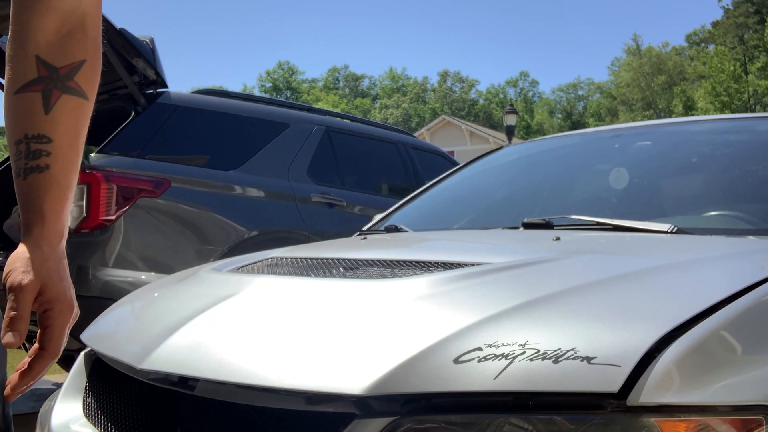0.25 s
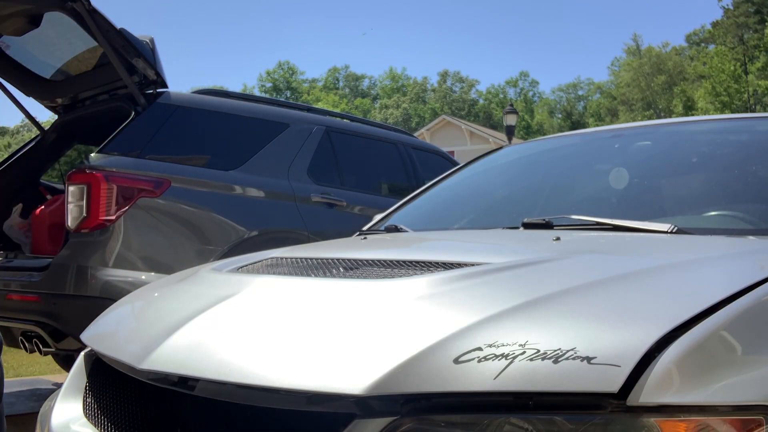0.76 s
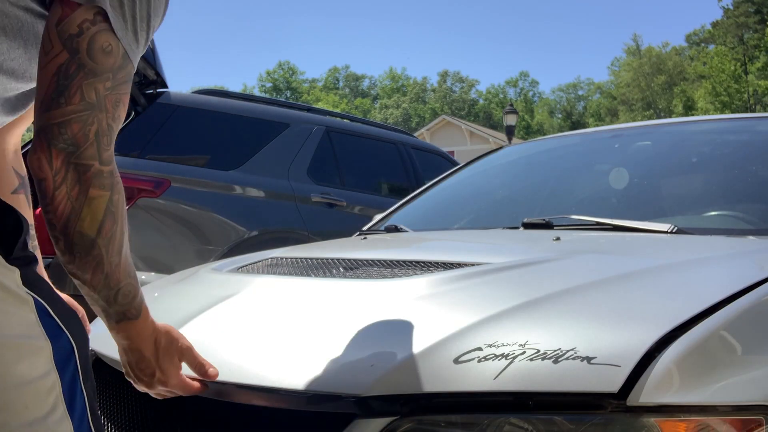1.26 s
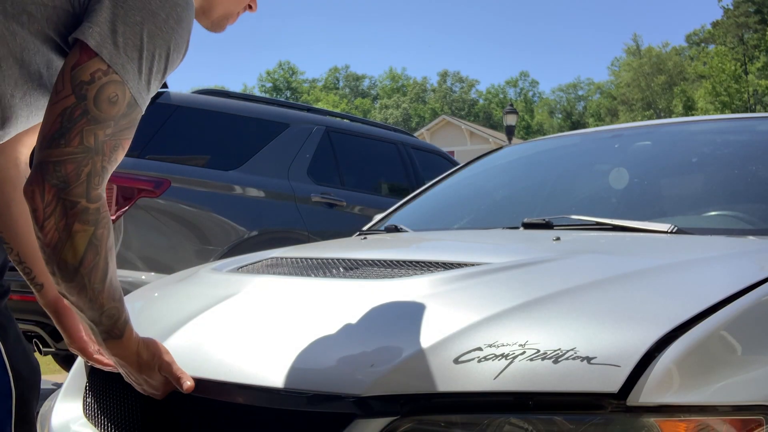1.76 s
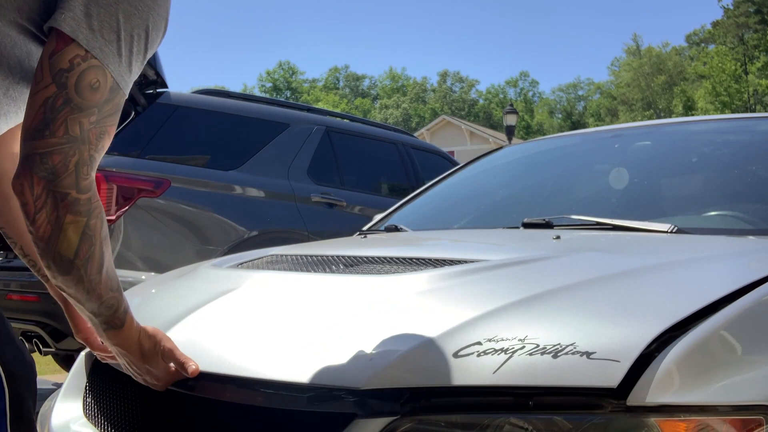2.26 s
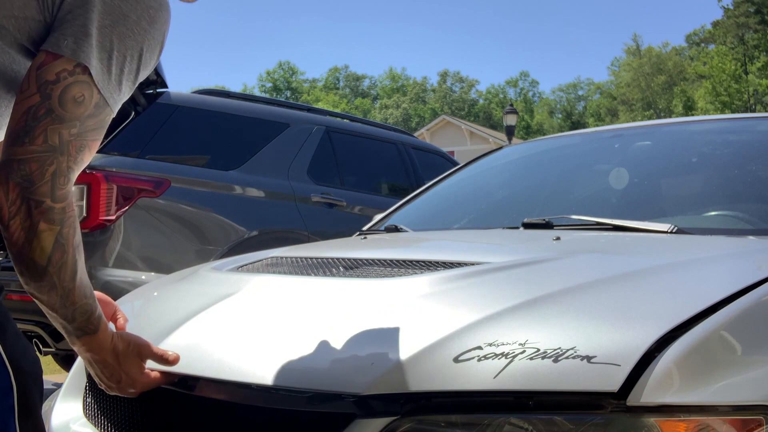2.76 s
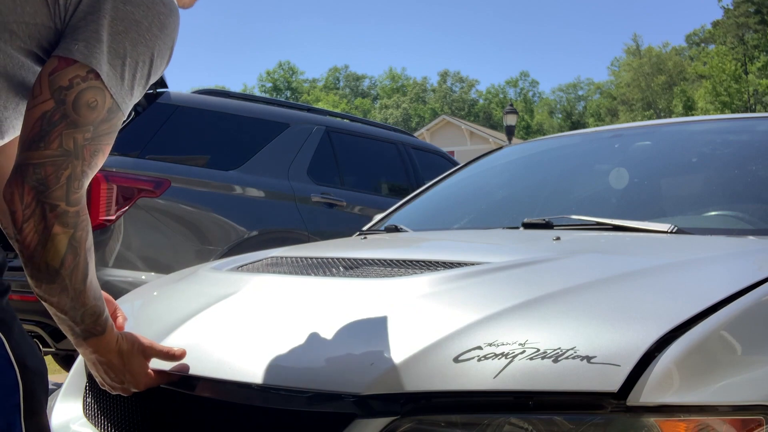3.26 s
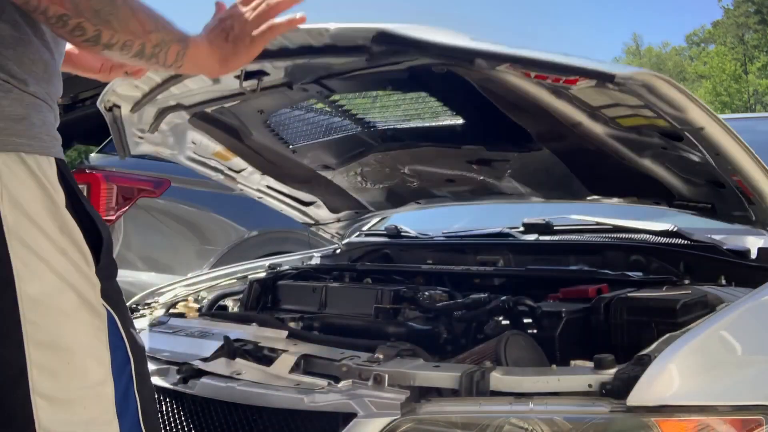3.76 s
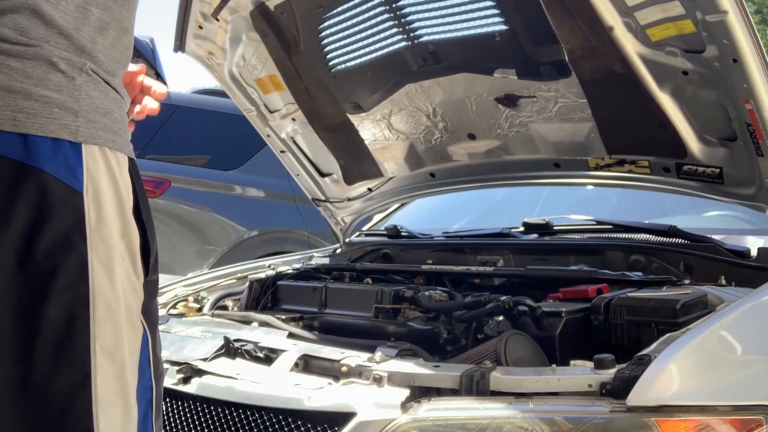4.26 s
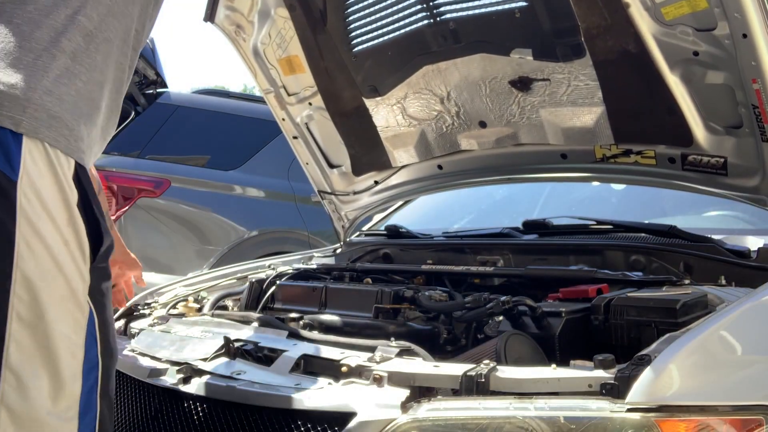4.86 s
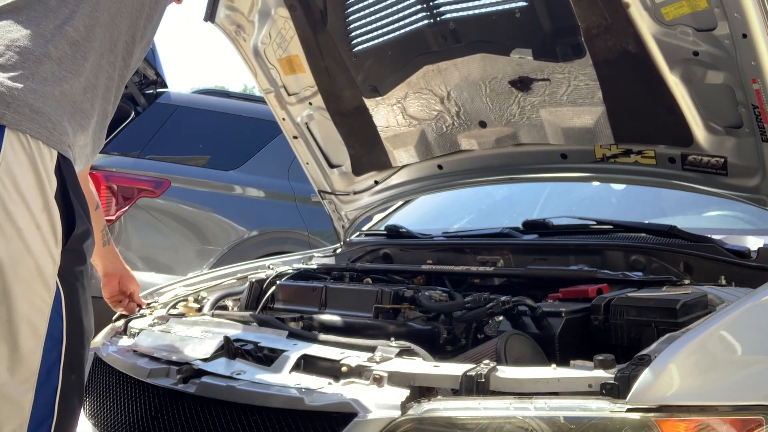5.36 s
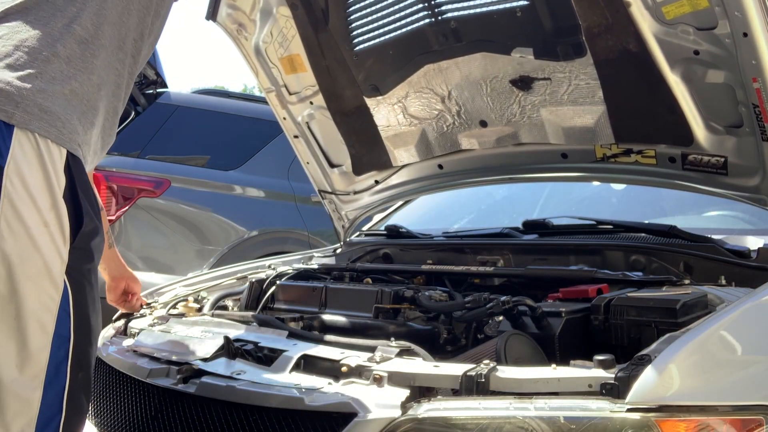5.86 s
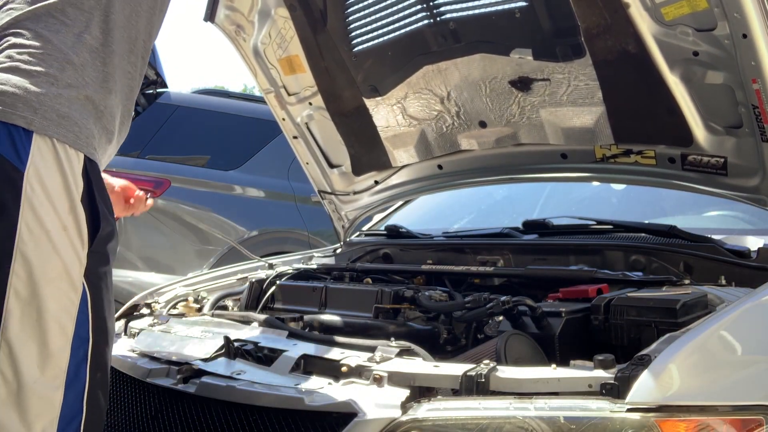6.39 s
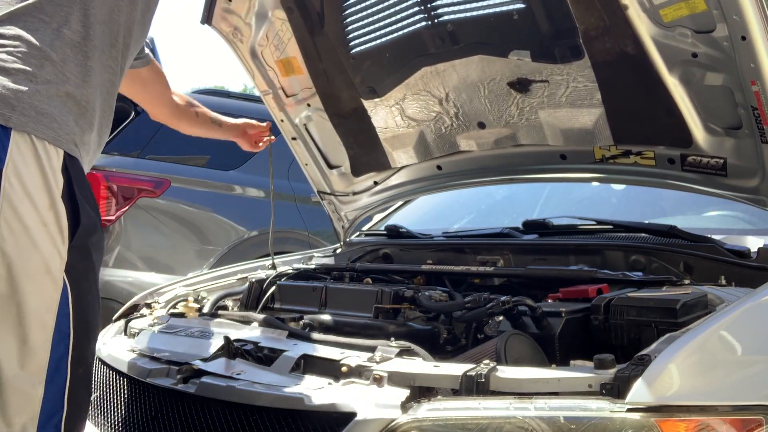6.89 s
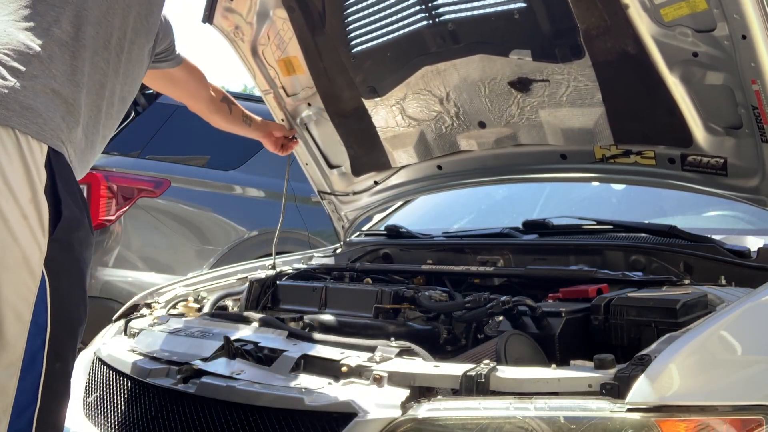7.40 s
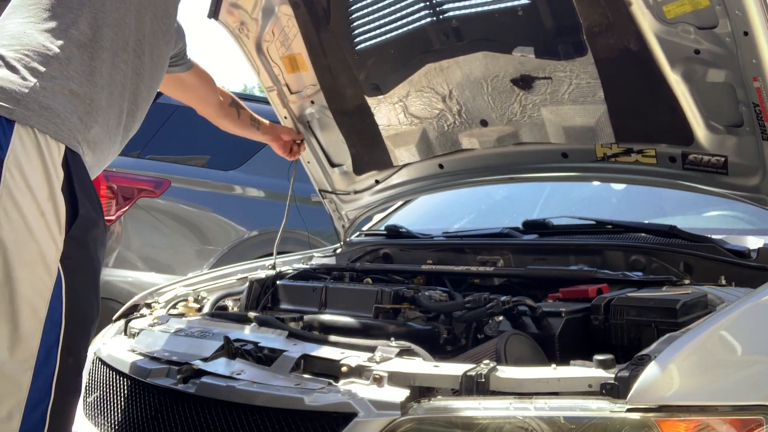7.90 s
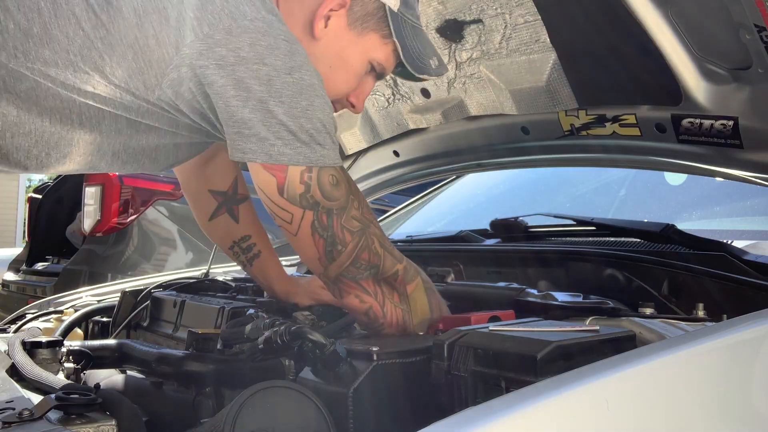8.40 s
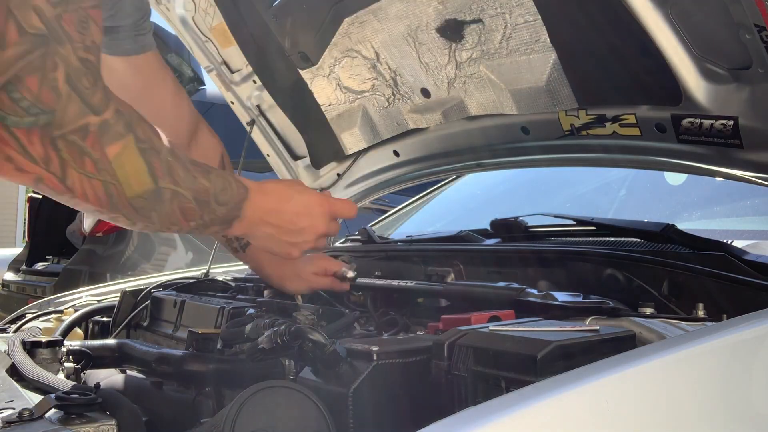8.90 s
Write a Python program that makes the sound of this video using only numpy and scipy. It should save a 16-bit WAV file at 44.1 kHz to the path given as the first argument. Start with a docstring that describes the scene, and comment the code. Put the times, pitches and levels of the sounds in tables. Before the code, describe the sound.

Close stereo pickup outdoors beside a car, over a faint low rumble. Fabric brushes, small latch snaps, then two heavy sheet-metal thuds, the second strongest and deepest. A brief high squeak and bright snap free the hood; hinges rasp and rattle. After a pause come a hollow knock, a sharp rod click, metallic sliding hiss, and firm hollow knocks as the rod seats. Faint taps and sleeve brushing finish it.

```python
"""Soft air and a low rumble, both coloured noise, lie under a car hood being opened in a quiet driveway.
Clothes rustle and a sleeve brushes brightly, as uneven noise; a pressing hand makes the sheet metal boom and
clunk with fading tones and noise. A sole squeaks as a gliding tone, the safety catch squeaks and snaps free, and
the hinges scrape and click. The steel prop rod is pulled from its clip, hisses as it swings up and knocks on the
raised hood. Last, the rod taps dryly, small parts click, a sleeve brushes lightly and the background briefly dips."""
import sys
import numpy as np
from scipy import signal
from scipy.fft import rfft, irfft, next_fast_len
from scipy.io import wavfile

SR = 44100
rng = np.random.default_rng(int(sys.argv[2]) if len(sys.argv) > 2 else 0)


def pcm_store(signal):
    """Save signal as 16-bit PCM."""
    levels = np.round(np.clip(np.atleast_2d(signal), -1, 1) * 32767)
    wavfile.write(sys.argv[1], SR, levels.astype(np.int16).T)


N = 403074
TIME = np.arange(N) / SR
RING = np.arange(32768) / SR  # time within one blow, boom or squeak [s]
PADDED = next_fast_len(N + SR // 10, real=True)  # spare room so that filters do not wrap around
SIDES = np.array([[1], [-1]])  # left ear, right ear

# The two ears: (frequency [Hz], left-right likeness of the background [-1 to 1], left minus right [dB])
STEREO = [(69.9, 0.9, 2), (280, 0.61, 1.5), (716, -0.43, -1), (1600, -0.23, -2.5), (4000, 0.16, -0.5),
          (10230, -0.17, 1)]
# Colour of the hinges and rod mount, both rubbed and struck: (frequency [Hz], relative level per Hz [dB])
HINGE_COLOUR = [(210, -35), (350, 3), (391, -4), (554, -3), (1460, -5.5), (1600, -6.5), (1910, -10),
                (2930, -16), (13000, -34.5), (15500, -45)]


def from_db(db):
    """Turn decibels into a gain."""
    return 10 ** (np.asarray(db) / 20)


def rms(x):
    """Average strength of a signal (root mean square)."""
    return np.sqrt(np.mean(x ** 2) + 1e-30)


def at_hz(rows, hz):
    """Read every column of a table at the given frequencies, on a logarithmic frequency axis."""
    points, *columns = np.transpose(rows)
    return [np.interp(np.log(hz + 1e-9), np.log(points), column) for column in columns]


def add(out, s, sound):
    """Mix a sound in at time s."""
    start = round(s * SR)
    out[start:start + len(sound)] += sound[:N - start]


def dying(t60):
    """A fade that falls by 60 dB in t60 seconds."""
    return from_db(-60 * RING / max(t60, 1e-3))


def shaped(white, colour, peaks=()):
    """Give a signal a colour and resonances, with steep ends; returns (frequencies, spectrum)."""
    hz = np.fft.rfftfreq(white.shape[-1], 1 / SR)
    low_end = 1 + (colour[0][0] / (hz + 1)) ** 8
    high_end = 1 + (hz / colour[-1][0]) ** 8
    lift = 1
    for centre, width, db in peaks:
        lift = lift + from_db(db) ** 2 / (1 + (2 * (hz - centre) / width) ** 2)
    gain = from_db(at_hz(colour, hz)[0]) * np.sqrt(lift / (low_end * high_end))
    return hz, rfft(white) * gain


def diffuse(colour, peaks=()):
    """Noise from all around, most alike in both ears in the bass; the mean of the ears has rms 1."""
    hz, (mid, side) = shaped(rng.standard_normal((2, PADDED)), colour, peaks)
    alike, pan_db = at_hz(STEREO, hz)
    alike = np.clip(alike, -.99, .99)
    ears = np.sqrt(1 + alike) * mid + np.sqrt(1 - alike) * side * SIDES
    x = irfft(from_db(SIDES * pan_db / 2) * ears, PADDED)[:, :N]
    return x / rms(x.mean(axis=0))


def rubbing(strokes, colour, grain_db, peaks=(), judder_db=1.5):
    """A crowd of uneven micro-slips, a millisecond or two each, excites a surface as strongly as it is rubbed."""
    force = 0
    for s, db, swell, hold, fade in strokes:
        slack = np.maximum((s - TIME) / swell, (TIME - s - hold) / fade)
        force = force + from_db(db - 20 * np.clip(slack, 0, 10))
    # the contact catches and lets go some tens of times a second
    catches = np.arange(0, N, 600)
    judder = np.interp(np.arange(N), catches, rng.standard_normal(len(catches)))
    force = force * from_db(judder_db * judder)
    # each slip keeps one random strength for 64 samples
    slips = np.repeat(rng.standard_normal(PADDED // 64 + 1), 64)[:PADDED]
    grains = rng.standard_normal(PADDED) * from_db(grain_db * slips)
    _, spectrum = shaped(grains, colour, peaks)
    friction = irfft(spectrum, PADDED)[:N]
    return force * friction / rms(friction)


def struck(blows, modes, colour, registers_db, t60s, ring, modes_db, crack_db, crack_t60, tail_db, tail_t60,
           clack_hz=850, rattle_db=2.5):
    """Each blow rings a part: clear modes over a wash of crowded ones, a short crack first, a faint tail last."""
    # Pitch ranges, each with its own balance and fade: (low edge [Hz], high edge [Hz])
    registers = [(150, 450), (450, 1100), (1100, 2800), (2800, 7000), (7000, 16000)]
    pivot_hz, clack_octaves = 1000, 1  # centre of the brightness tilt; spread of the clack
    rattle_s, spot_q = .004, 4.1  # time between touches of loose parts; sharpness of the spot resonance
    start = round(.03 * SR)  # the first 30 ms set the loudness of each register
    out = np.zeros(N)
    extras = []
    for low, high in registers:
        # the crack is weaker in the bass; the tail from neighbouring cars and walls is shorter in the treble
        crack = (from_db(crack_db) * dying(crack_t60)) ** 2 * low / (low + 700)
        tail = (from_db(tail_db) * dying(tail_t60 / (1 + low / 7000))) ** 2
        extras.append(crack + tail)
    octaves = np.log2(np.sqrt(np.prod(registers, axis=1)) / pivot_hz)
    midrange = np.exp(-((octaves - np.log2(clack_hz / pivot_hz)) / clack_octaves) ** 2)
    for s, level_db, brightness, clack_db, spot_hz, spot_db, attack_s, *held in blows:
        blow = 0
        onset = 1 - np.exp(-RING / max(attack_s, 1e-4))
        free = held[0] if held else 1  # a hand on the part changes its ring time
        # a harder contact tilts the balance upwards; where it lands decides how much the midrange clacks
        levels_db = level_db + np.array(registers_db) + brightness * octaves + clack_db * midrange
        hz, wash = shaped(rng.standard_normal(len(RING)), colour)
        wash = wash / rms(irfft(wash))
        # every blow lands elsewhere, so each mode gets a new strength and sign
        strength = from_db(modes_db + rng.normal(0, 2.4, len(modes)))
        strength = strength * rng.choice([-1, 1], len(modes))
        for (low, high), wash_t60, extra, db in zip(registers, t60s, extras, levels_db):
            band = irfft(wash * ((hz >= low) & (hz < high)))
            part = band * np.sqrt(dying(wash_t60 * free) ** 2 + extra)
            # loose parts chatter while the blow dies away
            touches = rng.standard_normal(256)
            chatter = np.interp(RING / rattle_s, np.arange(len(touches)), touches)
            part = part * from_db(rattle_db * chatter)
            for (mode_hz, mode_db, t60), gain in zip(modes, strength):
                if low <= mode_hz < high:
                    tone = np.sin(2 * np.pi * mode_hz * RING)
                    part = part + gain * from_db(mode_db) * dying(t60 * ring * free) * tone
            part = part * onset
            blow = blow + from_db(db) * part / rms(part[:start])
        # the spot that is hit favours one resonance of the part
        spot = signal.lfilter(*signal.iirpeak(spot_hz, spot_q, fs=SR), blow)
        add(out, s, blow + (from_db(spot_db) - 1) * spot)
    return out


def outdoors():
    """Soft air and far traffic over a low rumble with a motor's drone; the level dips briefly near the end."""
    # Background levels: (time [s], air level [dB], rumble level [dB])
    background = [(0, -56, -51.5), (2.2, -54, -51), (4.3, -57, -54), (5.5, -57.5, -49), (8.1, -55, -50),
                  (8.25, -58.5, -57)]
    # Colour of the air: (frequency [Hz], relative level per Hz [dB])
    air_colour = [(110, 3.5), (170, -0.5), (300, -3.5), (420, -7.5), (850, -9), (1100, -12), (1700, -24),
                  (2800, -28.5), (4000, -34), (5000, -41.5), (8000, -44), (13000, -41), (14200, -40.5),
                  (14900, -61.5)]
    # Colour of the rumble: (frequency [Hz], relative level per Hz [dB])
    rumble_colour = [(12, -50), (20, -10), (40, 0.5), (53, 9.5), (118, 4.5), (140, -21), (168, -11),
                     (200, -17), (260, -38), (440, -120)]
    # Drone of a distant motor: (frequency [Hz], width [Hz], power added, relative to the colour [dB])
    drone = [(58.7, 4.9, 3), (118.9, 3.5, 5)]
    dip_at_s, dip_width_s, dip_db = 8.545, 0.068, -6.5
    s, air_db, rumble_db = np.transpose(background)
    air = from_db(np.interp(TIME, s, air_db)) * diffuse(air_colour)
    rumble = from_db(np.interp(TIME, s, rumble_db)) * diffuse(rumble_colour, drone)
    dip = from_db(dip_db * np.exp(-((TIME - dip_at_s) / dip_width_s) ** 2))
    return (air + rumble) * dip


def driveway(x, panel_hz=400):
    """Each ear gets the direct sound and its own echoes; the panels are too small to return long waves."""
    # Echoes off the ground and the car panels:
    # (delay to left ear [ms], delay to right ear [ms], treble level relative to the direct sound [dB])
    echo_paths = [(0.617, 0.99, -18.5), (1.957, 1.45, -19), (3.303, 4.1, -10.5), (6.16, 5.3, -9.5),
                  (8.123, 9.4, -9.5), (13.72, 11.8, -7.5), (17.86, 22, -14), (26.53, 20, -16.5)]
    # Spread of the difference between the ears of the microphone pair: (frequency [Hz], boost [dB])
    ear_spread = [(70, 2.5), (140, 18), (280, 6.5), (550, 9), (1100, 3.5), (4000, 5.5)]
    hz = np.fft.rfftfreq(PADDED, 1 / SR)
    returned = (1j * hz / (panel_hz + 1j * hz)) ** 2
    echoes, echo_power = 0, 0
    for left, right, db in echo_paths:
        delay_s = np.array([[left], [right]]) / 1000
        echoes = echoes + from_db(db) * np.exp(-2j * np.pi * hz * delay_s)
        echo_power = echo_power + from_db(db) ** 2
    # offset the power that the echoes add
    paths = (1 + returned * echoes) / np.sqrt(1 + abs(returned) ** 2 * echo_power / 2)
    centre = paths.mean(axis=0)
    paths = centre + (paths - centre) * from_db(at_hz(ear_spread, hz)[0])
    balance = from_db(SIDES * at_hz(STEREO, hz)[1] / 2)
    return irfft(rfft(x, PADDED) * paths * balance, PADDED)[:, :N]


def clothes_rustle():
    """Cloth rubs on cloth: many uneven slips make a soft noise that swells and fades."""
    # Strokes of cloth: (full-strength time [s], level [dB], swell per 20 dB [s], hold [s], fade per 20 dB [s])
    strokes = [(.28, -73, .08, .02, .1), (.41, -70, .06, .1, .15), (.73, -60, .15, .11, .06),
               (.95, -70, .1, .09, .1), (1.05, -66, .08, .06, .08), (1.37, -56, .08, .05, .13),
               (1.61, -66, .15, .02, .06), (2.44, -68, .05, .015, .08), (8.905, -66, .012, .055, .025)]
    # Colour of the cloth: (frequency [Hz], relative level per Hz [dB])
    colour = [(350, -28), (600, -1), (736, -47), (866, -3), (1060, -0.5), (2040, -13.5), (3570, -7.5),
              (5440, -16.5), (13500, -25), (15500, -27)]
    return rubbing(strokes, colour, grain_db=3.5, judder_db=2.8)


def sleeve_brush():
    """A sleeve's small, treble-rich slips brush brightly near the start and lightly again later and near the end."""
    # Sleeve strokes: (full-strength time [s], level [dB], swell per 20 dB [s], hold [s], fade per 20 dB [s])
    strokes = [(.68, -55.5, .11, .16, .06), (4.98, -68, .15, .1, .08), (8.2, -76, .02, .17, .05),
               (8.372, -68, .005, .004, .03), (8.715, -66, .008, .03, .06), (8.86, -72, .015, .08, .04),
               (8.952, -63, .015, .012, .025), (9.003, -67, .02, .08, .08)]
    # Colour of the sleeve: (frequency [Hz], relative level per Hz [dB])
    colour = [(1200, 7), (3500, 2.5), (6300, -0.5), (9000, -4.5), (13000, 0), (15000, -5)]
    return rubbing(strokes, colour, grain_db=4.0, judder_db=-1.0)


def squeaks(waver_hz=260):
    """A sticking contact sings briefly: a rough tone that glides, swells and fades."""
    # A scuffing sole, then the safety catch sliding off its hook:
    # (time [s], length [s], start pitch [Hz], end pitch [Hz], level [dB])
    glides = [(1.034, 0.08, 4000, 3590, -70), (1.073, 0.066, 3450, 2760, -66),
              (3.373, 0.041, 5550, 5490, -55)]
    out = np.zeros(N)
    for s, length, start_hz, end_hz, db in glides:
        progress = np.minimum(RING / length, 1)
        phase = 2 * np.pi * np.cumsum(start_hz + (end_hz - start_hz) * progress) / SR
        # slow noise makes the tone waver within a band waver_hz wide
        smooth = signal.butter(2, waver_hz / 2, fs=SR, output="sos")
        grip = signal.sosfilt(smooth, rng.standard_normal((2, len(RING))))
        tone = grip[0] * np.sin(phase) + grip[1] * np.cos(phase)
        swell = np.sqrt(np.abs(np.sin(np.pi * progress)))
        add(out, s, from_db(db) * swell * tone / rms(tone))
    return out


def small_ticks():
    """Small parts click, and the rod taps dryly on the hood's inner frame: short rings after a sharp crack."""
    # Clicks and dry taps: (time [s], base level [dB], brightness [dB per octave], clack [dB],
    # spot resonance [Hz], spot lift [dB], attack [s])
    ticks = [(.516, -53.5, -.4, -6, 1600, 1.8, 0.00059), (1.146, -64.5, 4, 4, 1700, 1.6, 0.00059),
             (4.683, -71, 3.3, 4, 1900, 2, .003), (5.467, -66.5, -4, 8.5, 1600, 2.2, .003),
             (8.143, -61.5, -7, 10, 510, 12.6, 0.0017), (8.178, -66.5, -5, 0, 860, 3.3, 0.0044),
             (8.287, -62.5, 0.3, 4, 3250, 4.4, .001), (8.419, -55.5, -1, -3.5, 3200, 5, .0006),
             (8.44, -58.5, 3.2, 4.5, 1700, 6, .001), (8.449, -56.5, 3.5, 6, 5700, 9.4, .0006),
             (8.711, -57.5, -0.1, 4, 1500, 4.2, .003), (8.743, -57, -2, -1, 1450, 6.2, .0004),
             (8.79, -68, -0.2, 4, 1700, 5, .001), (8.902, -65.5, 1.5, -8, 3300, 4.4, 0.0025),
             (8.954, -60.5, -1, -9, 1610, 6, .001)]
    # Clear modes of these ticks: (frequency [Hz], base level [dB], 60 dB fade before scaling by ring [s])
    modes = [(883, 3, 0.13), (1500, -14, 0.11), (1660, 2.5, 0.13), (3480, 1, 0.08), (5550, 1, .09)]
    # Colour of their crowded modes: (frequency [Hz], relative level per Hz [dB])
    colour = [(88, -47), (150, 3.5), (221, 10), (766, -7.5), (860, -3), (1150, -4.5), (1660, -5.5),
              (2410, -14), (3350, -6.5), (5540, -13.5), (7410, -19.5), (9000, -14), (15500, -42)]
    return struck(ticks, modes, colour,
                  registers_db=[-6.0, -3.0, -2.5, -6.5, -18.5], t60s=[0.034, 0.14, 0.17, 0.17, 0.14],
                  ring=0.56, modes_db=-12.0, crack_db=10, crack_t60=0.032, tail_db=-31.0, tail_t60=0.25)


def hinge_and_mount_scrape():
    """Hinges and rod mount rub as they turn: catching metal makes a juddering scrape."""
    # Hinge and mount strokes:
    # (full-strength time [s], level [dB], swell per 20 dB [s], hold [s], fade per 20 dB [s])
    strokes = [(3.394, -51, 0.014, 0.005, .01), (3.49, -57, 0.04, 0.028, 0.44),
               (3.598, -47.5, 0.02, 0.079, 0.18), (3.895, -58, 0.015, 0.011, 0.059),
               (5.05, -51, 0.27, 0.023, 0.1), (5.185, -61, 0.044, 0.066, 0.06),
               (5.66, -59, 0.046, 0.0093, 0.046)]
    return rubbing(strokes, HINGE_COLOUR, grain_db=4.0, judder_db=2.4)


def hinge_and_mount_clicks():
    """The hinges and the rod mount click: small metal parts ring for a moment."""
    # Clicks: (time [s], base level [dB], brightness [dB per octave], clack [dB],
    # spot resonance [Hz], spot lift [dB], attack [s])
    clicks = [(3.604, -45, -0.3, -2, 3320, 9.5, 0.00052), (3.627, -43.5, 0.1, 3, 3500, 1, 0.00047),
              (3.678, -52.5, 0.5, -0.5, 1060, 7, .0003), (3.927, -60.5, 5.5, 7, 1500, 8.5, .0005),
              (3.954, -54, -1.5, -5, 2010, 10, .0003), (4.459, -68.5, 0, 1, 1850, 13, .001),
              (4.483, -71, 0, 0, 1890, 11, 0.00093), (5.182, -56, -6, -5, 2000, 13, 0.011)]
    # Clear modes of hinges and mount: (frequency [Hz], base level [dB], 60 dB fade before scaling by ring [s])
    modes = [(1063, -2, 0.067), (1834, 4.5, 0.076), (1925, -3, 0.094), (1980, -8, 0.15)]
    return struck(clicks, modes, HINGE_COLOUR,
                  registers_db=[-9.5, -2.5, -3.5, -11.0, -17.5], t60s=[0.036, 0.056, 0.1, 0.24, 0.17],
                  ring=0.58, modes_db=-3.0, crack_db=9.5, crack_t60=.021, tail_db=-19.5, tail_t60=0.71)


def rod_clicks():
    """The steel prop rod clicks, ringing in bright modes."""
    # Clicks: (time [s], base level [dB], brightness [dB per octave], clack [dB],
    # spot resonance [Hz], spot lift [dB], attack [s])
    clicks = [(5.549, -63.5, -0.1, 9, 4400, 7.3, .001), (6.027, -42, 2.5, 3, 3450, 2.8, 0.0052),
              (6.04, -47, -4.5, -11, 1400, 2.7, 0.0014)]
    # Clear modes of the rod: (frequency [Hz], base level [dB], 60 dB fade before scaling by ring [s])
    modes = [(1240, 7, .2), (1500, 1, 0.18), (1725, 4, 0.1), (3300, 3, 0.2), (3390, -19, .7),
             (3530, -7, .5), (3620, -4, .18), (6200, -14, .4), (9055, -18.5, .3)]
    # Colour of its crowded modes: (frequency [Hz], relative level per Hz [dB])
    colour = [(88, -34), (150, 6), (366, 1), (561, -15), (860, -3.5), (1090, -8.5), (1540, -4), (2760, -12),
              (3550, -3), (4140, -14.5), (6230, -14), (7000, -24.5), (8830, -11.5), (13800, -18.5),
              (15500, -29)]
    return struck(clicks, modes, colour,
                  registers_db=[-12.5, -8.5, -4.0, -3.5, -13], t60s=[0.49, 0.22, 0.12, 0.13, 0.092],
                  ring=0.43, modes_db=-11.5, crack_db=10.5, crack_t60=0.033, tail_db=-14.5, tail_t60=0.62)


def shifting(x, depth=0.41, moves_per_s=14, peaks_per_octave=2.3):
    """As the contact travels along the rod it favours some resonances and starves others, in turn."""
    hz, spectrum = np.fft.rfftfreq(PADDED, 1 / SR), rfft(x, PADDED)
    place = 2 * np.pi * peaks_per_octave * np.log2(hz + 1)
    for pattern in (np.cos(place), np.sin(place)):
        favour = rng.standard_normal(256)
        favour_now = np.interp(TIME * moves_per_s, np.arange(len(favour)), favour)
        x = x + depth * favour_now * irfft(spectrum * pattern, PADDED)[:N]
    return x


def rod_slide():
    """The swinging rod hisses with friction, and its resonances colour the hiss."""
    # Rod strokes: (full-strength time [s], level [dB], swell per 20 dB [s], hold [s], fade per 20 dB [s])
    strokes = [(6.452, -57, 0.01, 0.022, 0.054), (6.535, -45.5, 0.049, .15, 0.12),
               (6.74, -47.5, 0.061, 0.084, 0.15), (6.92, -68, 0.072, .03, 0.46)]
    # Colour of the sliding: (frequency [Hz], relative level per Hz [dB])
    colour = [(170, -4), (340, 2), (450, -0.5), (620, -9.5), (790, -13), (931, -2.5), (1340, -3),
              (1560, -0.5), (1950, -8.5), (2190, -3.5), (2910, -10), (4190, -4), (5020, -13), (5860, -7.5),
              (9110, -19.5), (12800, -1), (15500, -17)]
    # Resonances of the sliding rod: (frequency [Hz], width [Hz], power added, relative to the colour [dB])
    peaks = [(527, 40, 1), (1010, 81, 1), (1330, 60, -1), (1596, 93, 4.5), (2190, 25, 13), (2474, 140, 8.5),
             (3760, 100, 10.5), (3790, 49, 5), (4210, 140, 3.5), (5700, 110, 1), (5930, 73, 3.5)]
    return shifting(rubbing(strokes, colour, grain_db=2.5, peaks=peaks, judder_db=1.5))


def prop_knocks():
    """The hand-held prop knocks on the raised hood, and the grip changes how long it rings."""
    # Knocks: (time [s], base level [dB], brightness [dB per octave], clack [dB],
    # spot resonance [Hz], spot lift [dB], attack [s], ring time left by the grip [factor])
    knocks = [(5.065, -36, 2.5, 3.5, 940, 9.7, 0.0053, 0.87),
              (5.084, -43.5, 4, -3, 277, 19.5, 0.0025, 0.94), (7.155, -47, 0.5, 7, 225, 19.6, 0.012, 0.55),
              (7.226, -52, 1.5, 0, 200, 19.6, 0.0077, 0.63),
              (7.306, -51.5, -3, 11.5, 1330, 10.7, 0.0014, 0.54),
              (7.318, -51.5, -2, 6.5, 470, 9.8, .003, 1.06), (7.611, -48, 0.3, -9.5, 284, 12.3, .003, 1.1),
              (7.7, -29, 1, -11, 488, 6.6, 0.0038, 0.42), (7.722, -39.5, -1.5, -13, 330, 9.2, 0.003, 1.12),
              (7.807, -34, 1.5, -2, 2620, 12.7, 0.0027, 0.64),
              (7.819, -30, -0.4, 1, 560, 4.3, 0.0012, 0.89), (7.84, -40.5, -1.5, -3.5, 433, 10, .003, 0.91),
              (7.888, -48.5, -3, 4, 2800, 6, .004, 0.83)]
    # Clear modes of the raised hood: (frequency [Hz], base level [dB], 60 dB fade before ring and grip [s])
    modes = [(177.8, -6.5, 0.4), (244, -1, 0.23), (286.6, -7, 0.22), (324.4, -1, 0.17), (348.7, 0.5, 0.25),
             (389, -12, 0.19), (433, -12, 0.5), (486, -14.5, 0.2), (510, -15, 0.18), (629, -19.5, 0.37),
             (740, -25, 0.18), (847, -21.5, .25), (952, -22, 0.14), (1243, -25, .2), (1360, -21, 0.15),
             (1814, -28.5, 0.18), (2530, -35, .16), (2680, -41, 0.22)]
    # Colour of its crowded modes: (frequency [Hz], relative level per Hz [dB])
    colour = [(150, -14), (240, 3), (350, -1.5), (460, -1), (560, -10), (750, -11), (1000, -16.5),
              (1500, -25.5), (2100, -31.5), (2600, -30.5), (3300, -36.5), (4400, -34), (5700, -39),
              (7000, -53), (9000, -64), (15000, -65)]
    return struck(knocks, modes, colour,
                  registers_db=[-1.5, -6.0, -15.5, -28.5, -43.0], t60s=[0.31, 0.2, 0.13, 0.051, .09],
                  ring=0.86, modes_db=4, crack_db=4.5, crack_t60=.036, tail_db=-21.0, tail_t60=0.82,
                  clack_hz=1280)


def latch_snaps():
    """The latch snaps: its metal parts ring with a bright mix of modes."""
    # Snaps: (time [s], base level [dB], brightness [dB per octave], clack [dB],
    # spot resonance [Hz], spot lift [dB], attack [s])
    snaps = [(1.361, -46.5, -1, -3, 1330, 4.8, 0.0012), (1.371, -49.5, -2, -1.5, 970, 3, .001),
             (1.386, -50, 1.4, 2, 1340, 7.9, 0.0011), (1.78, -59, 0.2, -1, 1400, 2, 0.0005),
             (2.291, -58.5, 0, 4.5, 2200, 2, 0.0039), (2.358, -58.5, 0.3, -2.5, 3600, 7.8, 0.0018),
             (2.503, -44, -2.5, 5, 3420, 10, .001), (3.043, -45.5, 0.5, 5.5, 1800, 3, 0.0016),
             (3.4, -35.5, 2.5, -3.5, 2140, 3.4, 0.0011)]
    # Clear modes of the latch: (frequency [Hz], base level [dB], 60 dB fade before scaling by ring [s])
    modes = [(294, 4.5, 0.24), (431, -0.5, .26), (1080, 1.5, 0.21), (1382, -9.5, 0.36), (2250, -22, 0.19),
             (2574, -1.5, 0.16), (2890, -13.5, .2), (5670, -8.5, .07), (5800, -9.5, .11),
             (6330, -13.5, .09), (8600, -7, 0.088), (11170, -16, .11)]
    # Colour of its crowded modes: (frequency [Hz], relative level per Hz [dB])
    colour = [(88, -32), (150, 1.5), (209, -2), (490, -2.5), (607, -13), (1000, -6), (1110, -10.5),
              (1910, -9), (2860, -20.5), (3040, -21), (8330, -21.5), (12800, -25.5), (15500, -43)]
    return struck(snaps, modes, colour,
                  registers_db=[-0.8, 0.5, -2.7, -8.0, -12.5], t60s=[0.41, 0.21, 0.11, 0.13, .065],
                  ring=.85, modes_db=-11.5, crack_db=-0.5, crack_t60=0.06, tail_db=-15.5, tail_t60=0.56)


def booms(overtone=1.63, overtone_db=-9):
    """The wide panel takes a few cycles to swing up in its two lowest modes."""
    # Deep booms of the flexing bodywork: (time [s], level [dB], pitch [Hz])
    flexes = [(.85, -32, 57.7), (1.319, -36, 70.3), (1.964, -32.5, 93.3), (2.046, -22, 70.5),
              (2.123, -20.5, 69.3), (2.504, -15, 69.7), (3.612, -34.5, 64.5), (5.276, -23.5, 58.3),
              (5.379, -31.5, 58), (6.32, -33.5, 63.5), (6.727, -29.5, 68), (7.154, -38.5, 80.7)]
    swell_s, t60_s = .018, 0.36  # every boom swells and dies alike
    out = np.zeros(N)
    envelope = dying(t60_s) * (1 - np.exp(-(RING / swell_s) ** 2))
    for s, db, hz in flexes:
        phase = 2 * np.pi * hz * RING
        swing = np.sin(phase) + from_db(overtone_db) * np.sin(overtone * phase)
        add(out, s, from_db(db) * swing * envelope)
    return out


def hood_clunks():
    """The shut hood clunks: its sheet metal rings in many modes after a strong crack."""
    # Clunks: (time [s], base level [dB], brightness [dB per octave], clack [dB],
    # spot resonance [Hz], spot lift [dB], attack [s])
    clunks = [(1.455, -48.5, -0.81, -6.5, 348, 15.3, 0.0028), (1.964, -31.5, 1.05, -11.5, 330, 3.4, 0.0027),
              (2.043, -25, 0.89, 1, 567, 2.8, 0.0017), (2.114, -37.5, -1.3, 4.5, 766, 4, .001),
              (2.144, -39, -2.5, 2, 495, 3.7, 0.00077), (2.163, -45, -2.7, 0, 696, 4.5, .001),
              (2.5, -21.5, 1.24, 0.6, 3420, 8.7, 0.0014), (2.554, -37, 0.29, 2.5, 2500, 7.1, 0.0014)]
    # Clear modes of the shut hood: (frequency [Hz], base level [dB], 60 dB fade before scaling by ring [s])
    modes = [(169, -10, 0.69), (236.3, -2.5, 0.83), (364, -3.5, 0.1), (413, -7, .3), (483, 4, .33),
             (532, -11, 0.19), (630, -17.5, 0.31), (702, -14, .35), (796, -5.5, 0.25), (857, -2, 0.22),
             (1023, -9.5, .3), (1180, -16, .3), (1460, -9, 0.13), (1550, -23, .24), (1680, -7, 0.11),
             (1970, -13.5, .23), (2066, -26, 0.16), (2200, -28, .3), (2626, -24, 0.32), (2960, -25, 0.23),
             (3360, -29, .22), (3570, -21, 0.085), (3720, -15, .14), (6040, -19, .14)]
    # Colour of its crowded modes: (frequency [Hz], relative level per Hz [dB])
    colour = [(88, -37), (150, -3.5), (314, 1), (352, 2), (428, -3.5), (550, -3.5), (1320, -20.5),
              (1730, -17.5), (2810, -30.5), (3600, -23.5), (4600, -32), (5870, -28), (7560, -37.5),
              (8330, -33), (14300, -42.5), (15500, -59)]
    return struck(clunks, modes, colour,
                  registers_db=[-2, -3.0, -10.5, -25, -30.0], t60s=[0.24, 0.29, 0.12, 0.24, 0.12],
                  ring=0.78, modes_db=-7.5, crack_db=12.0, crack_t60=0.036, tail_db=-13.5, tail_t60=0.7,
                  clack_hz=1280, rattle_db=1.1)


def scene():
    """Blows, booms and friction between the cars, over the outdoor background."""
    background = outdoors()
    friction = clothes_rustle() + sleeve_brush() + squeaks() + hinge_and_mount_scrape() + rod_slide()
    clicks = small_ticks() + hinge_and_mount_clicks() + rod_clicks()
    knocks = prop_knocks() + latch_snaps() + hood_clunks()
    return driveway(friction + clicks + knocks + booms()) + background


def record(dry):
    """A steep low-pass filter removes the top of the treble."""
    cutoff_hz = 15300
    return signal.sosfilt(signal.ellip(10, .2, 80, cutoff_hz, fs=SR, output="sos"), dry)


dry = scene()
out = record(dry)
pcm_store(out)
```